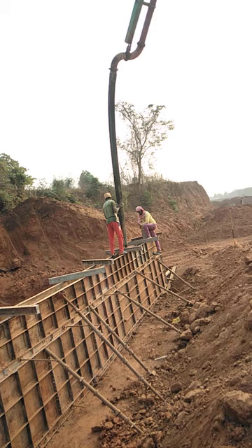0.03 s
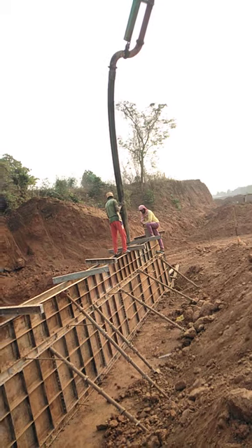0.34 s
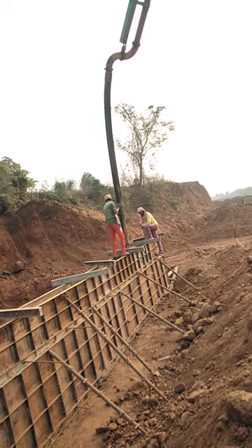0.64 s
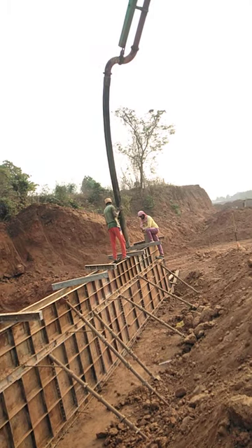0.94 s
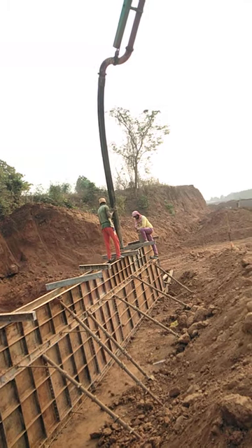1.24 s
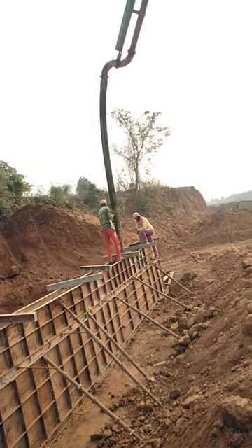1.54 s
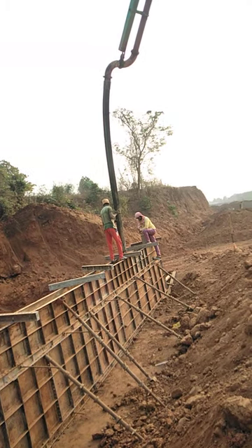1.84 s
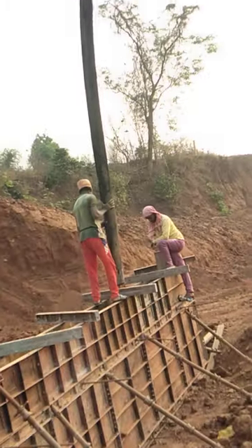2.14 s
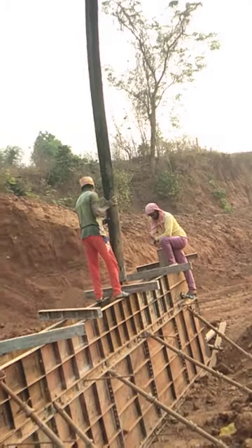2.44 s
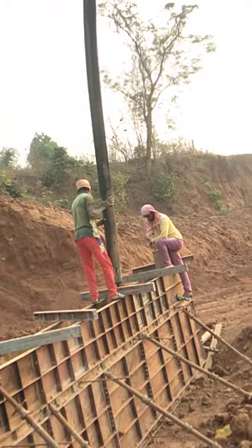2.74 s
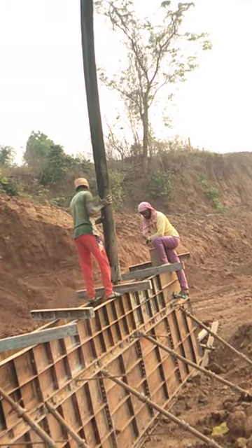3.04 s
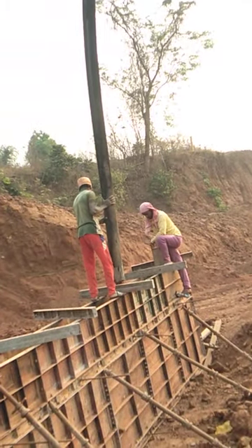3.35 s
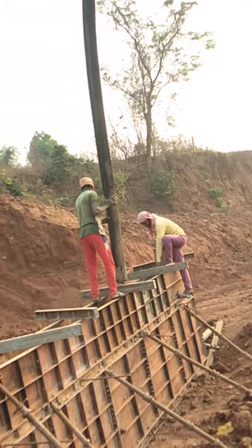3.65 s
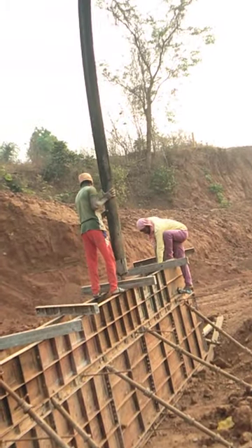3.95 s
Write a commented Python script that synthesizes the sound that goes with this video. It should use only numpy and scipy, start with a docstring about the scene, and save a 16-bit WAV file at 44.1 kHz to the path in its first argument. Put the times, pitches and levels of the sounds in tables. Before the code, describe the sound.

Heard from a distance in an open earth cutting, a diesel concrete pump drones with a fast metallic clatter and gritty hiss. A few short scrapes of wet mix pass through the pipe, then the exhaust swells slightly under load.

```python
"""An earth cutting, with a concrete pump's six-cylinder diesel running steadily some way off.
Its firings drone and rattle the block and panels; the exhaust rumbles and swells under load.
Wet mix scrapes through the steel pipe, and the rattle and scrapes echo faintly off the earth banks.
A slower machine hums alongside, the pump whines thinly, and a wide hiss with a little grit lies on top.
The sound is mono and fades in at the start."""
import sys
import numpy as np
from scipy import signal
from scipy.io import wavfile

SR = 44100
rng = np.random.default_rng(int(sys.argv[2]) if len(sys.argv) > 2 else 0)


def bounce(signal):
    """Save signal as a 16-bit WAV file at the path given by the first command-line argument."""
    frames = np.transpose(np.atleast_2d(signal))
    limited = np.clip(frames, -1, 1)
    pcm = np.round(limited * 32767).astype(np.int16)
    wavfile.write(sys.argv[1], SR, pcm)


N = 176400

CYCLE_HZ = 14.52   # four-stroke cycles per second
# The engine's lope. Each entry: one cylinder's relative knock strength in dB, in firing order.
CYLINDER_DB = [-4.5, -8, -8, -7.5, -18, -13]


def exhaust(cycles):
    """Uneven firings make a drone with overtones and puff out a rumble; the pipe swells under load."""
    # Fader rides for the drone, overtones and rumble. Each row: time in seconds, relative level in dB.
    drone_ride = [(0.3, -33.5), (0.64, -33.5), (0.73, -40), (1.0, -34.5), (1.4, -34), (1.85, -36.5),
                  (2.38, -32.5), (2.6, -37.5), (2.95, -41), (3.35, -37), (4.0, -36.5)]
    overtone_ride = [(0.3, -1), (2.2, -3.5), (2.8, 2), (4.0, -2.5)]
    rumble_ride = [(0.3, -36.5), (0.92, -36.5), (1.15, -35.5), (1.45, -37.5), (1.85, -35.5), (2.3, -36),
                   (2.75, -34.5), (3.1, -36), (3.45, -35.5), (4.0, -35.5)]
    # The tone at nine times the cycle rate. Each row: time in seconds, level in dB.
    ninth_ride = [(0.3, -46), (1.2, -46.5), (1.9, -44.5), (2.4, -42), (2.6, -36), (2.77, -46),
                  (2.95, -35.5), (3.3, -41), (3.75, -52), (3.95, -42)]
    # Weaker engine tones. Each row: multiple of the cycle rate, relative level in dB.
    overtone_mix = [(12, -53), (14, -51.5), (22, -46.5), (24, -51.5)]
    # The rumble's dark colour. Each row: frequency in Hz, relative spectral density in dB.
    rumble_colour = [(25, -27), (40, -19), (55, -6), (70, -7), (110, -3.5), (160, -0.5), (200, -2),
                     (260, -2.5), (290, -6.5), (345, -5.5), (450, -10), (700, -13), (1500, -43)]
    # Throaty swells as the pump takes load. Each row: peak time and half-width in seconds, level in dB.
    load_swells = [(0.78, 0.068, -35), (1.04, 0.039, -34.5), (2.58, 0.061, -34), (2.96, 0.11, -35),
                   (3.23, 0.1, -39), (3.55, 0.052, -35.5)]
    # Exhaust pipe resonances. Each row: centre in Hz, width in Hz, relative level in dB.
    pipe_modes = [(134.6, 32, -2.5), (199, 45, -1.5), (250, 63, -6.5), (330, 40, -3.5)]
    jitter = 0.028 * drift(15)   # as a share of the firing interval
    firing = np.sin(2 * np.pi * (len(CYLINDER_DB) * cycles + jitter))
    drone = from_db(-3 + 1.5 * drift(15)) * level(drone_ride) * rms_one(firing)
    ninth = level(ninth_ride) * rms_one(np.sin(2 * np.pi * 9 * cycles))
    rush = coloured_noise(rumble_colour, flicker_db=0.5, flicker_rate=7.7, count=24)
    rumble = from_db(0.5) * level(rumble_ride) * rms_one(rush * (1 + 0.19 * firing))
    throat = swells(load_swells) * rms_one(resonant_noise(pipe_modes))
    overtones = level(overtone_ride) * tones(cycles, overtone_mix, waver_db=5)
    return drone + ninth + throat + rumble + overtones


def clatter(cycles):
    """Each firing knocks a dying burst of noise into the resonances of block and panels."""
    # Block and panel resonances. Each row: centre in Hz, width in Hz, relative level in dB.
    panel_modes = [(622, 94, -7), (745, 180, 0.5), (862, 130, -5.5), (1050, 187, -1), (1470, 226, -7),
                   (1673, 340, -3.5), (2170, 214, -6), (2400, 163, -8.5), (2954, 400, -12.5),
                   (3864, 460, -12.5), (4524, 320, -11.5), (5040, 870, -13.5)]
    # Fader rides for the body and the treble. Each row: time in seconds, relative level in dB.
    body_ride = [(0.35, -35.5), (0.55, -34.5), (0.68, -37), (0.88, -38), (1.02, -37.5), (1.4, -38.5),
                 (1.8, -36), (2.05, -37.5), (2.4, -34.5), (2.58, -35), (2.8, -36), (3.02, -35), (3.25, -36),
                 (3.6, -36.5), (3.68, -32), (3.78, -35), (3.9, -34), (4.0, -37)]
    treble_ride = [(0.35, -35), (0.47, -33.5), (0.62, -34), (0.9, -34), (1.15, -36), (1.55, -36),
                   (2.05, -35.5), (2.35, -34), (2.85, -34.5), (3.35, -35.5), (3.7, -34), (4.0, -34)]
    knock_decay_s, scatter_db, treble_from_hz = 0.01, 3, 1300
    firings = cycles * len(CYLINDER_DB)
    which = firings.astype(int)
    scatter = np.clip(rng.standard_normal(1024), -2, 2)[which]
    strength_db = np.take(CYLINDER_DB, which, mode="wrap") + scatter_db * scatter
    age_s = (firings % 1) / (CYCLE_HZ * len(CYLINDER_DB))
    force = 1 + from_db(strength_db) * np.exp(-age_s / knock_decay_s)   # knocks over a steady bed
    rings = np.zeros((2, N))
    for hz, width_hz, db in panel_modes:
        ringing = band(force * rng.standard_normal(N), hz - width_hz / 2, hz + width_hz / 2, order=1)
        rings[int(hz > treble_from_hz)] += from_db(db + 0.8 * drift(8.9)) * ringing
    body, treble = band(rings, low_hz=369, high_hz=6040, order=4)
    return from_db(0.5) * level(body_ride) * rms_one(body) + level(treble_ride) * rms_one(treble)


def wet_mix():
    """Short rushes of wet mix scrape through the steel pipe and set it ringing."""
    # The scrapes. Each row: peak time and half-width in seconds, level in dB.
    rushes = [(0.49, 0.07, -37), (0.752, 0.024, -32.5), (0.875, 0.02, -35), (0.929, 0.027, -29.5),
              (1.065, 0.02, -34.5)]
    # Steel pipe resonances. Each row: centre in Hz, width in Hz, relative level in dB.
    pipe_modes = [(753, 300, -2.5), (1037, 180, 3.5), (1630, 330, -3.5), (2260, 400, -1), (2900, 360, -5.5),
                  (4520, 470, -4), (5000, 400, -7)]
    return swells(rushes) * rms_one(resonant_noise(pipe_modes))


def hiss():
    """A wide, smooth rush on top of the engine."""
    # Its fader ride. Each row: time in seconds, relative level in dB.
    ride = [(0.4, -43.5), (0.45, -42.5), (1.16, -44), (2.94, -42), (3.48, -45), (3.7, -43.5), (3.9, -45.5),
            (3.94, -42.5), (4.0, -44.5)]
    # Its bright colour. Each row: frequency in Hz, relative spectral density in dB.
    colour = [(1000, -9), (3000, -5.5), (5300, 3.5), (6200, -4.5), (7300, -6.5), (8400, -2), (9500, -5.5),
              (10700, -3.5), (12200, 2), (13000, 2.5), (14000, -2), (16000, -2.5)]
    return from_db(3) * level(ride) * coloured_noise(colour, flicker_db=0.67, flicker_rate=22, count=30)


def machine_hum():
    """A slower machine hums on the first three multiples of its turning rate."""
    # Its fader ride. Each row: time in seconds, relative level in dB.
    ride = [(0.3, -50), (1.0, -51), (2.6, -45.5), (3.2, -49), (3.55, -38), (4.0, -52)]
    turns = turning(hz=24.35, wander=0.0089)
    return level(ride) * tones(turns, [(1, -6), (2, -6), (3, 0.5)], waver_db=1.5)


def grit():
    """Small dry ticks at random, like gravel in the wet mix."""
    ticks_per_s, spread_db, decay_s = 170, 3.0, 0.001
    onsets = rng.random(N) < ticks_per_s / SR
    sizes = from_db(spread_db * np.minimum(rng.exponential(1, N), 4))
    bursts = signal.lfilter([1], [1, -np.exp(-1 / (decay_s * SR))], onsets * sizes + 1e-18)
    return from_db(-49.5) * rms_one(band(bursts * rng.standard_normal(N), low_hz=1300, high_hz=5200))


def pump_whines():
    """Narrow resonances in the pump sing as thin, unsteady metallic tones."""
    # The whines. Each row: centre in Hz, width in Hz, relative level in dB.
    modes = [(1019, 21, -54), (4520, 85, -51)]
    # Their fader ride. Each row: time in seconds, gain in dB.
    ride = [(0.3, -5), (1.07, 3), (1.25, -3), (4.0, -4.5)]
    return level(ride) * resonant_noise(modes)


def bank_echoes(sound):
    """The earth banks throw back two faint, quick slaps."""
    # The reflections. Each row: delay in seconds, gain in dB.
    slaps = [(.023, -17.5), (.061, -17.5)]
    return sum(from_db(db) * np.pad(sound, (int(s * SR), 0))[:N] for s, db in slaps)


def bump():
    """One soft, deep push that dies away just after the bass arrives."""
    start_s, decay_s, below_hz = 0.25, 0.15, 50
    age_s = np.arange(N) / SR - start_s
    push = (age_s > 0) * np.exp(-np.abs(age_s) / decay_s)
    return from_db(-34) * signal.sosfilt(signal.butter(2, below_hz, fs=SR, output="sos"), push)


def from_db(db):
    """Decibels to gain."""
    return 10 ** (np.asarray(db) / 20)


def rms_one(x):
    """Scale to an rms of one."""
    return x / np.sqrt(np.mean(x ** 2) + 1e-20)


def level(ride):
    """Gain at every sample, gliding between points given in seconds and dB."""
    s, db = np.transpose(ride)
    return from_db(np.interp(np.arange(N) / SR, s, db))


def swells(rows):
    """Bell-shaped rises and falls of gain."""
    t = np.arange(N) / SR
    return sum(from_db(db) * np.exp(-((t - peak_s) / half_s) ** 2) for peak_s, half_s, db in rows)


def drift(rate_hz):
    """Slow random motion with a spread of one."""
    hop, settle = 40, 2000   # samples per step; steps for the smoothing to settle
    pole = np.exp(-2 * np.pi * rate_hz * hop / SR)
    noise = rng.standard_normal(N // hop + settle + 2)
    slow = signal.lfilter([1], [1, -2 * pole, pole * pole], noise)[settle:]
    return np.interp(np.arange(N) / hop, np.arange(len(slow)), rms_one(slow))


def band(x, low_hz, high_hz, order=2):
    """Butterworth band-pass."""
    return signal.sosfilt(signal.butter(order, [low_hz, high_hz], "band", fs=SR, output="sos"), x)


def coloured_noise(colour, flicker_db, flicker_rate, count):
    """Noise in narrow bands that follow a spectrum, each flickering a little; rms one."""
    hz, db = np.transpose(colour)
    edges, out = np.geomspace(hz[0], hz[-1], count + 1), 0
    for low, high in zip(edges, edges[1:]):
        gain_db = np.interp(np.log(low * high) / 2, np.log(hz), db) + flicker_db * drift(flicker_rate)
        out = out + from_db(gain_db) * band(rng.standard_normal(N), low, high, order=3)
    return rms_one(out)


def resonant_noise(modes):
    """Noise ringing in a set of resonances."""
    return sum(from_db(db) * rms_one(band(rng.standard_normal(N), hz - width_hz / 2, hz + width_hz / 2))
               for hz, width_hz, db in modes)


def turning(hz, wander):
    """Turns made by a shaft whose speed wanders slightly."""
    return rng.random() + np.cumsum(hz * (1 + wander * drift(1.74))) / SR


def tones(turns, partials, waver_db):
    """Wavering sines on multiples of a shaft's rate."""
    out = 0
    for multiple, db in partials:
        waver = from_db(waver_db * drift(3.3))
        sine = np.sin(2 * np.pi * (multiple * turns + rng.random()))
        out = out + from_db(db) * rms_one(waver * sine)
    return out


def scene():
    """Engine, wet mix, hum, whines and hiss, with faint echoes; alike in both ears."""
    cycles = turning(CYCLE_HZ, wander=0.0033)
    rattle = clatter(cycles) + grit() + wet_mix()
    hum = machine_hum()
    mix = exhaust(cycles) + rattle + bank_echoes(rattle) + hum + pump_whines() + hiss()
    return np.tile(mix, (2, 1))


def record(dry):
    """The sound fades in over a faint low floor, the bass last and with a bump; the top is cut."""
    fade_start_s, fade_s, first_gain = 0.071, 0.24, 0.1
    bass_in_s, bass_below_hz, cutoff_hz = 0.22, 160, 15750
    t = np.arange(N) / SR
    rise = (t - fade_start_s) / fade_s
    fade = (rise > 0) * np.minimum(first_gain + rise * (1 - first_gain), 1)
    bass = signal.sosfilt(signal.butter(1, bass_below_hz, fs=SR, output="sos"), dry)
    bass_duck = (1 - from_db(-10)) * np.clip((bass_in_s - t) / .01, 0, 1)
    floor = from_db(-91) * rms_one(band(rng.standard_normal(N), low_hz=10, high_hz=60))
    high_cut = signal.ellip(12, .1, 80, cutoff_hz, fs=SR, output="sos")
    return signal.sosfilt(high_cut, (dry - bass_duck * bass) * fade + bump() + floor)


dry = scene()
out = record(dry)
bounce(out)
```